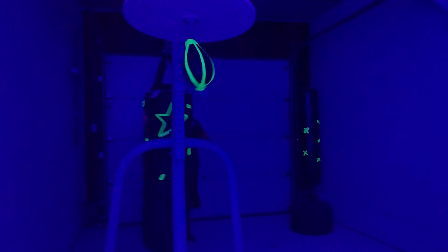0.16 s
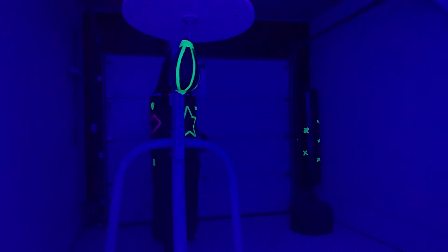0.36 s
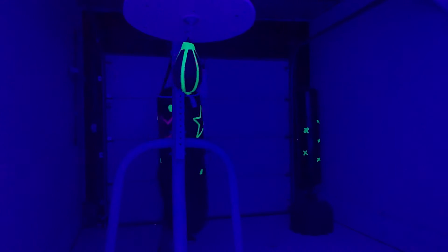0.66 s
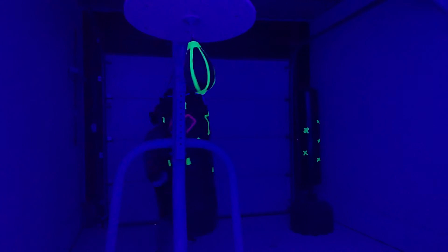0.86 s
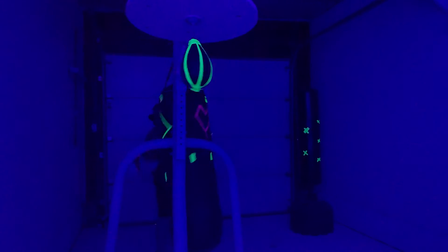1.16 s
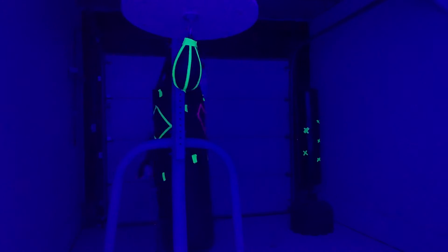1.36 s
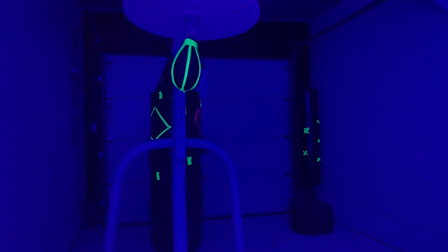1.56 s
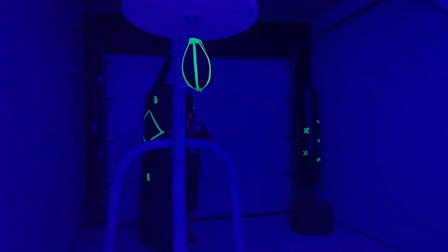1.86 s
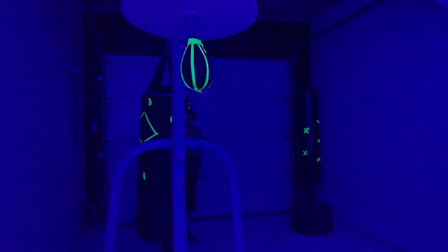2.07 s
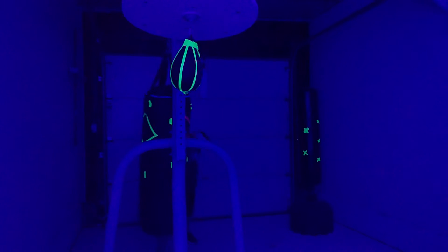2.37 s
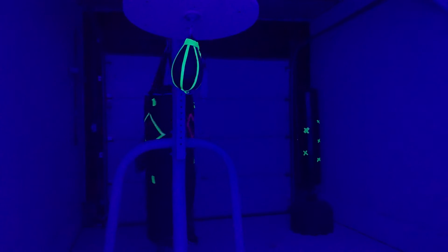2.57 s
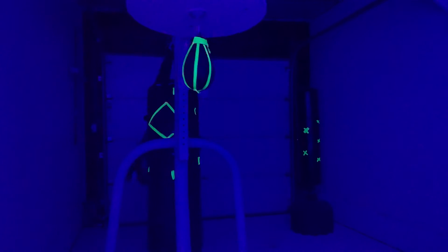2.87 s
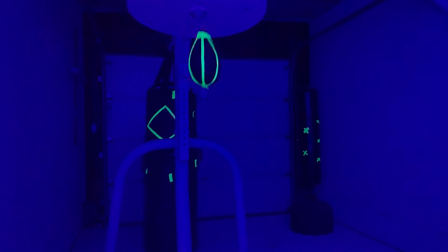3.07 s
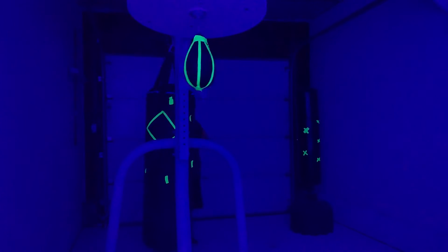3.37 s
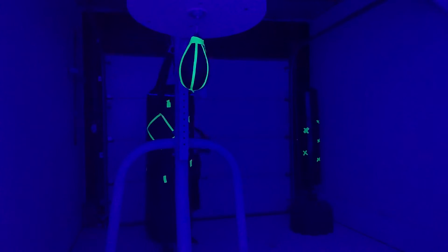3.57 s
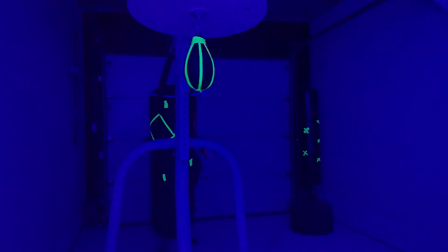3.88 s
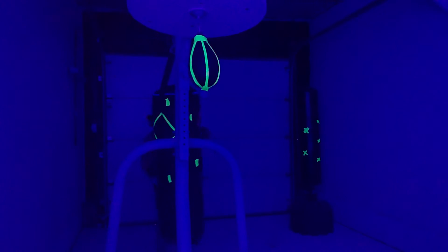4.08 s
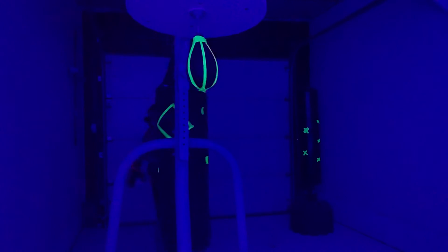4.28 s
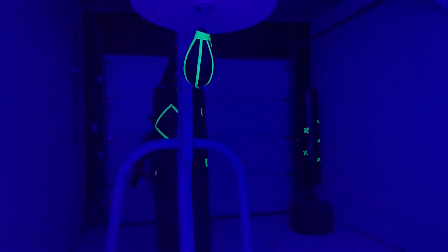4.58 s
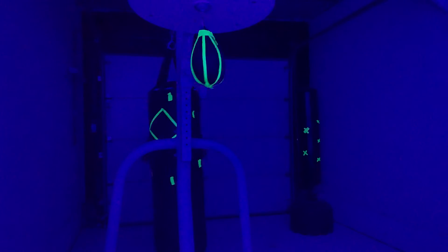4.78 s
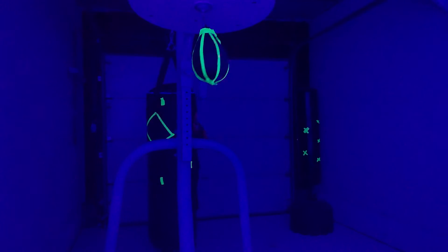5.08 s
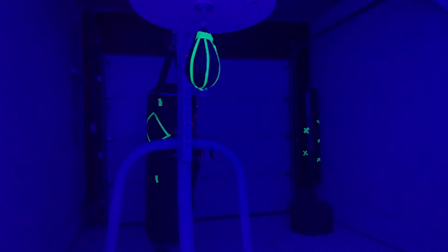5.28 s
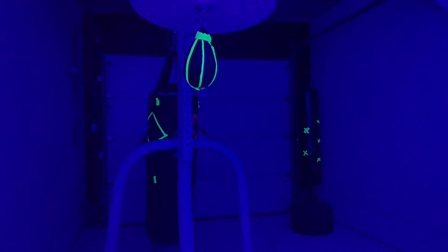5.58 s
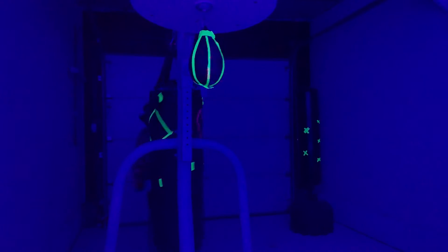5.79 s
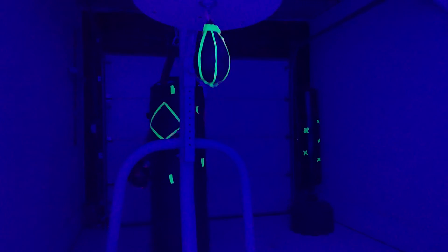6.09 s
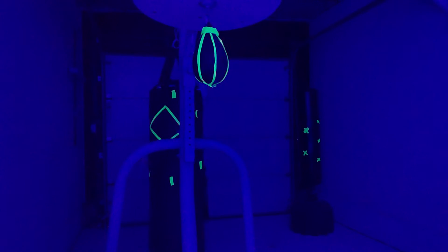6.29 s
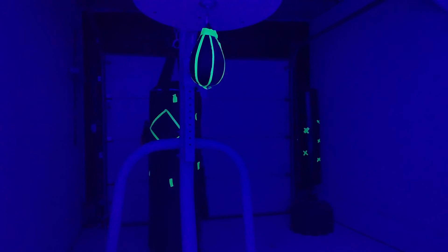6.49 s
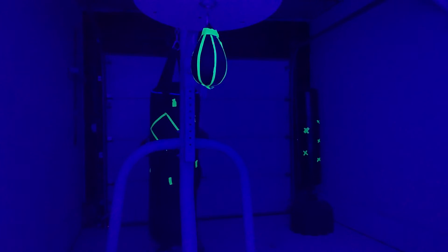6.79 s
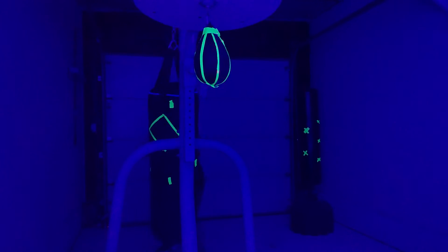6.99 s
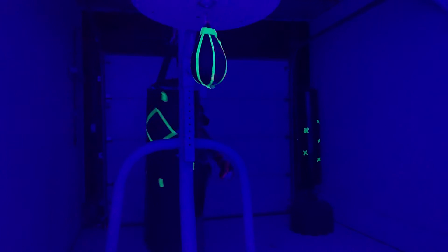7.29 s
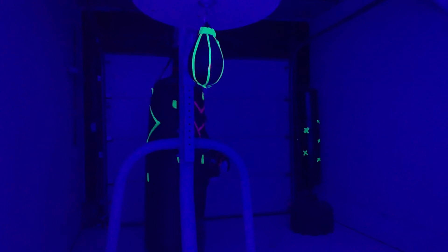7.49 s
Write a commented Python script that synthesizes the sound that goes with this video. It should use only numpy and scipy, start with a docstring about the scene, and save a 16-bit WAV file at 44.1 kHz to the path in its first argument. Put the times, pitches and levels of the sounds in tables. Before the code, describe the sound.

Five hard kicks slap a hanging heavy bag in a bare, echoing home gym, with booming steps, scuffing soles and rattling chain.

```python
"""Heavy-bag kicks in a live gym

A small, bare home gym in stereo; the microphone hears far more of the room than of the direct sound.
Five times over, two running steps boom on the floor modes, a sole scrapes round and the kick slaps the bag:
filtered grains with a resonant crack. Chain links rattle as clusters of grains, and the steel stand rings
in decaying modes. Soles shuffle as gritty noise, and now and then one squeals in unsteady harmonics.
"""
import sys
import numpy as np
from scipy import signal
from scipy.fft import rfft, irfft
from scipy.io import wavfile
from scipy.ndimage import uniform_filter1d

SR = 44100
rng = np.random.default_rng(int(sys.argv[2]) if len(sys.argv) > 2 else 0)


def store_wav(level_fs):
    """Save 16-bit WAV to argv[1]."""
    pcm = np.round(np.clip(np.atleast_2d(level_fs), -1, 1) * 32767)
    wavfile.write(sys.argv[1], SR, pcm.T.astype(np.int16))


N = 336924
T = np.arange(SR) / SR  # one second: the life of any single event

# treble lift per dB of brightness: (frequency [Hz], share)
BRIGHTNESS_SHARE = [(2000, 0.22), (7000, 0.9), (12000, 0.88)]

# the gym's decay, read only at the band centres of room(): (frequency [Hz], t60 [s])
ROOM_T60 = [(60, 1.5), (250, 0.57), (500, 0.64), (1000, 0.83), (3000, 0.72), (7000, 1.2), (10000, -0.9),
            (15000, 0.5)]
# the gym's stereo width: (frequency [Hz], side minus mid [dB])
ROOM_SIDE = [(60, -54), (125, -14), (250, -13.5), (500, -6.5), (1000, 1), (4000, 0.5)]
BALANCE_DB = -0.82  # left minus right
TOP_HZ = 16100

# steady air of the place: (frequency [Hz], relative level per Hz [dB])
AIR_SPECTRUM = [(20, -22), (40, -28), (62, 17), (110, -8), (300, 4), (510, 7.5), (750, 5.5), (2000, -2),
                (6000, -3), (10000, -24), (15000, -29)]
AIR_DB = -44

# soles shuffling back into place: (time [s], length [s], level [dB], brightness [dB])
SCUFFS = [(0.081, 0.057, -20.5, 0), (0.253, .048, -21, -7), (0.421, 0.022, -24.5, 4),
          (0.546, 0.025, -23.5, -3), (0.589, 0.032, -20.5, 5.5), (0.801, 0.028, -24.5, 1),
          (0.828, 0.026, -24, 5.5), (1.239, 0.085, -22.5, 5), (1.475, 0.086, -22.5, 2.5),
          (1.687, 0.081, -22, -3), (1.794, 0.12, -31, 7), (2.015, 0.037, -19.5, 5.5),
          (2.168, 0.073, -24, -7), (2.315, .055, -23.5, 6), (2.496, 0.033, -24, 0.5),
          (2.775, 0.12, -23, 5.5), (3.091, .11, -26, 5), (3.408, 0.092, -26, 3), (3.635, 0.039, -28.5, 0),
          (3.793, .07, -36, -19), (4.005, 0.03, -23.5, 4.5), (4.765, 0.085, -28, 3),
          (5.059, 0.061, -34, 5.5), (5.258, 0.035, -30, 0), (5.368, 0.033, -37, 5.5),
          (5.681, 0.041, -37, -2), (6.309, 0.054, -19.5, 3.5), (6.413, 0.026, -21, 1),
          (6.607, 0.036, -22.5, 0.5), (6.838, 0.027, -23.5, -6), (7.031, 0.032, -17.5, 4),
          (7.09, .04, -18.5, -4), (7.18, 0.042, -19.5, 1), (7.487, 0.12, -22.5, 3.5), (7.583, .06, -14, 2)]
# a foot pivoting until the kick lands: (time [s], level [dB], brightness [dB])
PIVOTS = [(1.041, -19.5, 3), (2.636, -19.5, -2), (4.212, -18.5, 4.5), (5.845, -19.5, 2), (7.29, -19.5, -2)]
# grit under a sliding sole: (frequency [Hz], relative level per Hz [dB])
SOLE_SPECTRUM = [(80, -17), (200, -10), (400, -6.5), (510, 2.5), (680, -6), (850, -3.5), (1100, 2),
                 (2100, 3.5), (3500, -0.5), (5200, -2.5), (6800, -2), (8300, -8), (11000, -9.5),
                 (15000, -14.5)]
# fine hiss of a skimming sole: (frequency [Hz], relative level per Hz [dB])
SKIM_SPECTRUM = [(500, -8), (2000, -34), (4000, 2), (7000, -17), (9500, -6), (15000, -5.5)]
RISE_SHARE = 0.17  # the longer a slide, the more gently it starts
LANDING_S, LANDING_BRIGHT_DB = 0.051, 3
# a pivot is brisk at first, then a duller drag
BRISK_S, DRAG_DB, DRAG_BRIGHT_DB = 0.075, -4.5, -13.5
# the other foot follows each shuffle, louder per second of the shuffle's length
FOLLOW_S, FOLLOW_LENGTH_S, FOLLOW_BRIGHT_DB = 0.12, 0.051, -9
FOLLOW_DB, FOLLOW_DB_PER_S = -22, 151

# heavy footfalls: (time [s], level [dB], floor pitch [Hz], scuff of the landing sole [dB])
STEPS = [(0.708, -15, 88, -26.5), (0.933, -11.5, 86.7, -20.5), (2.335, -16, 84.6, -27.5),
         (2.553, -13, 89, -19.5), (3.942, -19, 86, -31), (4.154, -13, 83.3, -23), (5.516, -25.5, 85, -39),
         (5.751, -17.5, 86.7, -29), (6.973, -16, 86, -28.5), (7.215, -16.5, 79.6, -21)]
# modes of the floor under a heel: (multiple of its pitch, relative level [dB], t60 [s])
FLOOR_MODES = [(.72, -5.5, 0.27), (1, 4.5, 0.13), (1.64, -5.5, 0.22), (2.55, -13.5, 0.26)]
# dull knock of the shoe: (frequency [Hz], relative level per Hz [dB])
HEEL_SPECTRUM = [(30, -12), (85, 0), (220, 2), (400, 1.5), (600, -3), (1000, -3), (2000, -37), (6000, -38)]

# squeals of a twisting sole: (time [s], length [s], level [dB], pitch [Hz], tilt [dB per octave])
SQUEALS = [(0.076, 0.027, -26.5, 775, -1), (0.248, 0.019, -26, 780, -0.5), (0.62, 0.023, -28, 1032, -2),
           (1.051, 0.045, -22.5, 781, -2.5), (1.168, 0.055, -24.5, 808, 0.5), (2.626, 0.16, -31, 769.5, -1),
           (4.264, 0.076, -26.5, 785, 0)]
# partials of the squeal: (multiple of its pitch, relative level [dB])
SQUEAL_PARTIALS = [(1, -14), (2, 0), (3, -4), (4, -6), (6, -12), (7, -16)]

# the bag knocking on its hanger between kicks: (time [s], level [dB])
BUMPS = [(0.002, -23.5), (0.249, -28), (0.39, -26), (0.57, -32), (1.095, -17), (1.479, -18.5), (1.682, -22),
         (2.0, -29.5), (2.976, -18), (3.139, -20.5), (3.22, -24.5), (3.712, -32.5)]
# muffled bump of the packed bag: (frequency [Hz], relative level per Hz [dB])
BUMP_SPECTRUM = [(25, -40), (45, -30), (62, 4), (95, -13.5), (145, 1), (200, -8), (320, -6), (500, -5),
                 (1200, -13), (4000, -57)]
# a kicked bag drops back on its hanger once, then nudges it as it sways
JOLT_LAG_S, REBOUND_S, REBOUND_DB = 0.00804, 0.072, 0.5
SWAY_GAP_S, SWAY_FALL_DB_PER_S = 0.2, 4.5

# the chain snapping taut: (time [s], level [dB], rattle length [s], brightness [dB])
SNATCHES = [(2.874, -11.5, 0.038, 16), (4.419, -24, 0.012, 21), (6.101, -13, 0.044, 21),
            (6.297, -22, 0.022, 27)]
# bouts of chain rattle: (time [s], swell [s], level [dB], brightness [dB], dying away [dB per s],
# pitch of the tube struck [Hz], its clang [dB], its t60 [s], pitch of the hook's clink [Hz])
RATTLES = [(0.0, 0.0057, -14.5, 6, 235, 1572, -41, .3, 2300),
           (1.291, 0.11, -12, -12, 220, 1123, -21.5, 0.83, 2310),
           (1.53, 0.071, -25.5, 8, 75, 1413, -27.5, 0.42, 2047),
           (2.844, 0.11, -12.5, -6.5, 127, 957, -19, 0.45, 2000),
           (4.42, 0.079, -11, -4.5, 220, 1007, -20, 0.78, 2780),
           (6.03, 0.12, -10, -3, 240, 1355, -23.5, 0.55, 1566),
           (6.235, .01, -18, -9, 120, 1163, -24, 0.47, 1480),
           (7.238, 0.013, -20.5, 8, 200, 933, -29.5, 0.27, 1850),
           (7.585, .05, -13.5, 14, 130, 1865, -22.5, .3, 2300)]
# links knocking together: (frequency [Hz], relative level per Hz [dB])
CHAIN_SPECTRUM = [(100, -28), (220, -3), (320, -4), (400, -9), (600, 0.5), (820, -4), (1050, 4),
                  (1400, 3.5), (1800, -0.5), (2300, -2.5), (3200, -4), (4500, -7.5), (6700, -12),
                  (9000, -15.5), (15000, -18.5)]
# modes of the steel stand: (nominal frequency [Hz], relative level before scatter [dB], t60 [s])
STAND_MODES = [(255.3, -6, 0.55), (324.8, -13.5, 1), (457.3, 8.5, 0.21), (640, -17, 0.15), (967, -5, 1),
               (968, -10, 0.43), (1063, -8, 0.23), (1161, 11.5, 0.1), (1273, -15, 0.5), (1346, -2, 0.22),
               (1572, -14, 0.64), (1800, -27, 0.35), (2074, 24, 0.36), (2330, 11, 0.52), (2850, 6, 0.24),
               (3440, -15, 0.091)]
# within a bout the links meet in clusters that swell, then grow weaker and duller
CLUSTER_GAP_S, CLUSTER_S = 0.04, 0.034
SWELL_DB_PER_S, DULLING_DB_PER_S = 7, 70
STEEL_DB = -10  # ringing stand, relative to the links

# the hook clinks briefly just before every clang
CLINK_DB, CLINK_T60_S, CLANG_LAG_S = 3, 0.15, 0.015
# the stand's post rings with every clang, lasting this many times as long as the tube struck
POST_HZ, POST_DB, POST_LASTING = 949, -3.5, 1.06

# kicks on the bag cover: (time [s], rise [s], slap level [dB], brightness [dB], pitch of the crack [Hz],
# crack relative to slap [dB], jolt of the bag [dB], its later sway before it dies down [dB])
KICKS = [(1.266, 0.0072, -6.5, -14, 2660, 6.5, -16.5, -28), (2.831, 0.0024, -2.5, -3, 2270, -1, -19, -35.5),
         (4.411, 0.0018, -4, 8, 2430, 6.5, -24.5, -60), (5.986, 0.034, 2.5, 4, 1790, 7, -16.5, -29),
         (7.548, 0.02, -3.5, 11, 1900, 6.5, -28.5, -36)]
# slap of the cover: (frequency [Hz], relative level per Hz [dB])
SLAP_SPECTRUM = [(100, -20), (400, -15.5), (800, -1), (1500, -3.5), (2600, -4), (3500, -7.5), (5000, -11),
                 (8000, -15), (15000, -23)]


def undb(db):
    """Decibels to gain."""
    return 10 ** (np.asarray(db) / 20)


def unit(x):
    """Scale to rms 1."""
    return x / np.sqrt(np.mean(x ** 2))


def read(points, hz):
    """A table joined by straight lines on a log-frequency axis."""
    at, value = np.transpose(points)
    return np.interp(np.log(hz + 1), np.log(at), value)


def colour(x, spectrum, bright_db=0):
    """Give x a spectrum with an optional treble lift; rms 1."""
    hz = np.fft.rfftfreq(len(x), 1 / SR)
    gain_db = read(spectrum, hz) + bright_db * read(BRIGHTNESS_SHARE, hz)
    return unit(irfft(rfft(x) * undb(gain_db), len(x)))


def fade(t60):
    """Exponential decay, 60 dB in t60 seconds."""
    return np.exp(-np.log(1000) * T / t60)


def stroke(length, rise, release):
    """A push that builds, holds and lets go; times in seconds."""
    build = np.minimum(T / max(rise, 1 / SR), 1)
    return build * np.exp(-np.maximum(T - length, 0) / release)


def grains(rate, spread_db):
    """Random tiny impacts, rate a second, of scattered sizes."""
    sign, size = rng.standard_normal((2, SR))
    struck = rng.random(SR) < rate / SR
    return struck * np.sign(sign) * undb(spread_db * size)


def wobble():
    """A random waver that changes within some milliseconds; rms 1."""
    return unit(uniform_filter1d(rng.standard_normal(SR), size=260))


def add(track, s, sound):
    """Mix a sound into the track at time s."""
    start = max(int(s * SR), 0)
    track[start:start + len(sound)] += sound[:max(N - start, 0)]


def widen(mid, side):
    """Left and right hear nearly the same bass but unrelated treble."""
    hz = np.fft.rfftfreq(len(side), 1 / SR)
    side_gain = undb(read(ROOM_SIDE, hz))
    m, s = rfft(mid), rfft(side) * side_gain
    return irfft(np.array([m + s, m - s]) / np.sqrt(1 + side_gain ** 2), len(mid))


def room(x, direct_db=-10, early_db=-5, early_t60=0.07):
    """One source in the gym: weak direct sound, a flurry from near walls, a dense tail longest in the bass."""
    hz = np.fft.rfftfreq(SR, 1 / SR)
    centres = np.geomspace(60, 15000, 9)
    noise = rfft(rng.standard_normal((2, SR)))
    tail = 0
    for centre in centres:
        band = read(list(zip(centres, centres == centre)), hz)
        tail = tail + irfft(noise * band, SR) * fade(read(ROOM_T60, centre))
    early = np.array([grains(rate=3000, spread_db=1.0) for _ in range(2)]) * fade(early_t60)
    diffuse = rfft(unit(tail) + undb(early_db) * unit(early))
    # a diffuse field carries the same energy in every band
    diffuse /= np.sqrt(uniform_filter1d(np.abs(diffuse) ** 2, size=90, axis=1))
    response = widen(*irfft(diffuse, SR))
    response[:, 0] += undb(direct_db)
    response /= np.sqrt(np.sum(response ** 2) / 2)
    return signal.fftconvolve(x[None], response[:, :SR * 9 // 10], axes=1)[:, :N]


def air():
    """The steady air of the place: coloured noise, wide in the treble."""
    mid, side = (colour(rng.standard_normal(N), AIR_SPECTRUM) for _ in range(2))
    return undb(AIR_DB) * widen(mid, side)


def slides():
    """Landings, pivots and two-footed shuffles; rows of (time [s], length [s], level [dB], brightness [dB])."""
    rows = [(s, LANDING_S, db, LANDING_BRIGHT_DB) for s, _, _, db in STEPS]
    for (s, db, bright_db), (kick_s, *_) in zip(PIVOTS, KICKS):
        drag_s = s + BRISK_S
        rows.append((s, BRISK_S, db, bright_db))
        rows.append((drag_s, kick_s - drag_s, db + DRAG_DB, DRAG_BRIGHT_DB))
    for s, length, db, bright_db in SCUFFS:
        follow_db = db + FOLLOW_DB + FOLLOW_DB_PER_S * length
        rows.append((s, length, db, bright_db))
        rows.append((s + FOLLOW_S, FOLLOW_LENGTH_S, follow_db, FOLLOW_BRIGHT_DB))
    return rows


def scuffs(grit_rate=9000, touch_db=-13, touch_gain=2.7, touch_share=0.36):
    """A sliding sole catches on countless grains; a fine hiss skims its start, louder in brighter slides."""
    out = np.zeros(N)
    for s, length, db, bright_db in slides():
        rise = RISE_SHARE * length
        grit = colour(grains(grit_rate, spread_db=3.5), SOLE_SPECTRUM, 0.5 * bright_db)
        slide = stroke(length, rise, release=0.02) * grit
        hiss = colour(rng.standard_normal(SR), SKIM_SPECTRUM)
        skim = stroke(touch_share * length, rise=0.45 * rise, release=0.017) * hiss
        add(out, s, undb(db) * (slide + undb(touch_db + touch_gain * bright_db) * skim))
    return out


def steps(contact=0.0084, heel_db=-9, heel_t60=0.31):
    """A soft heel loads the floor: its low boom, and the duller knock of the shoe."""
    boom, knock = np.zeros((2, N))
    loading = 1 - np.exp(-(T / contact) ** 2)
    for s, db, hz, _ in STEPS:
        modes = sum(undb(mode_db) * fade(t60) * np.sin(2 * np.pi * hz * k * T)
                    for k, mode_db, t60 in FLOOR_MODES)
        add(boom, s, -undb(db) * modes * loading)
        heel = colour(rng.standard_normal(SR), HEEL_SPECTRUM)
        add(knock, s, undb(db + heel_db) * fade(heel_t60) * heel)
    return boom, knock


def squeals(waver=0.007, release=0.008, flutter_db=2.5):
    """The twisting sole sticks and slips at an unsteady pitch; each partial flutters on its own."""
    out = np.zeros(N)
    for s, length, db, hz, tilt_db in SQUEALS:
        phase = 2 * np.pi * np.cumsum(hz * (1 + waver * wobble())) / SR
        tone = 0
        for k, partial_db in SQUEAL_PARTIALS:
            level_db = partial_db + tilt_db * np.log2(k) + flutter_db * wobble()
            tone = tone + undb(level_db) * np.sin(k * phase)
        add(out, s, undb(db) * stroke(length, release, release) * unit(tone))
    return undb(2.5) * room(out) + undb(-11) * out


def jolts(count=6):
    """Each kick jolts the bag, which rebounds and sways ever more gently; rows of (time [s], level [dB])."""
    rows = list(BUMPS)
    for s, *_, db, sway_db in KICKS:
        ages = REBOUND_S + SWAY_GAP_S * (np.arange(count) + 1 + rng.random(count))
        rows += [(s + JOLT_LAG_S, db), (s + REBOUND_S, db + REBOUND_DB)]
        rows += [(s + age, sway_db - SWAY_FALL_DB_PER_S * age) for age in ages]
    return rows


def bumps(t60=0.15):
    """The packed bag jolts on its hanger with a muffled bump."""
    out = np.zeros(N)
    for s, db in jolts():
        thud = colour(rng.standard_normal(SR), BUMP_SPECTRUM)
        add(out, s, undb(db) * fade(t60) * stroke(1, rise=0.0029, release=1) * thud)
    return out


def clusters(count=7):
    """Snatches, and bouts that swell and die away; rows of (time [s], level [dB], length [s], brightness [dB])."""
    rows = list(SNATCHES)
    for s, swell, db, bright_db, fall_db, *_ in RATTLES:
        uneven = rng.uniform(-0.15, 0.15, count) * (np.arange(count) > 0)
        for age in CLUSTER_GAP_S * (np.arange(count) + uneven):
            before, after = max(swell - age, 0), max(age - swell, 0)
            level_db = db - SWELL_DB_PER_S * before - fall_db * after
            rows.append((s + age, level_db, CLUSTER_S, bright_db - DULLING_DB_PER_S * after))
    return rows


def chain(link_rate=850):
    """Links knock together in short clusters, and each cluster sets the stand ringing."""
    out = np.zeros(N)
    for s, db, length, bright_db in clusters():
        links = colour(grains(link_rate, spread_db=5.5), CHAIN_SPECTRUM, bright_db)
        links *= stroke(length / 2, rise=0.0005, release=length / 2)
        # every cluster lands differently, so the modes share its energy differently
        chance = rng.standard_normal((len(STAND_MODES), 3))
        ring = 0
        for (hz, mode_db, t60), (louder, sharper, phase) in zip(STAND_MODES, chance):
            tone = np.sin(2 * np.pi * (hz * (1 + 0.0035 * sharper) * T + phase))
            ring = ring + undb(mode_db + 2 * louder) * fade(t60) * tone
        ring *= 1 - np.exp(-2 * T / length)
        ring *= np.sqrt(np.sum(links ** 2) / np.sum(ring ** 2))  # same energy as the links
        add(out, s, undb(db) * (links + undb(STEEL_DB) * ring))
    return out


def tube_strikes():
    """Each bout strikes hook, tube and post; rows of (time [s], level [dB], pitch [Hz], t60 [s])."""
    rows = []
    for s, *_, tube_hz, db, t60, hook_hz in RATTLES:
        clang_s = s + CLANG_LAG_S
        rows.append((s, db + CLINK_DB, hook_hz, CLINK_T60_S))
        rows.append((clang_s, db, tube_hz, t60))
        rows.append((clang_s, db + POST_DB, POST_HZ, POST_LASTING * t60))
    return rows


def clangs(split=0.015, twin_db=-5):
    """A slightly oval tube rings on a close pair of modes that beat."""
    out = np.zeros(N)
    for s, db, hz, t60 in tube_strikes():
        twin = np.sin(2 * np.pi * (hz * (1 + split) * T + rng.random()))
        pair = np.sin(2 * np.pi * hz * T) + undb(twin_db) * twin
        add(out, s, undb(db) * pair * fade(t60) * np.minimum(T / 0.015, 1))
    return out


def kicks(slap_t60=0.085, crack_q=2.35):
    """The shin slaps the cover: a crack, pitched by the trapped air, that the filling soon soaks up."""
    out = np.zeros(N)
    for s, rise, db, bright_db, hz, crack_db, _, _ in KICKS:
        slap = colour(grains(rate=6000, spread_db=3.5), SLAP_SPECTRUM, bright_db)
        crack = signal.lfilter(*signal.iirpeak(hz, crack_q, fs=SR), slap)
        shape = np.minimum(T / rise, 1) * fade(slap_t60)
        add(out, s, undb(db) * shape * (slap + undb(crack_db) * crack))
    return out


def scene():
    """Sources sound from their places in the room; floor boom and tubes also reach the microphone straight."""
    boom, knock = steps()
    tubes = clangs()
    feet = room(scuffs()) + room(knock + undb(-15) * boom) + squeals()
    stand = room(chain() + undb(2) * tubes)
    bag = room(kicks() + bumps())
    near = undb(-1.0) * boom + undb(1.5) * tubes
    balance = undb(np.array([[BALANCE_DB], [-BALANCE_DB]]) / 2)
    return (air() + feet + stand + bag + near) * balance


def record(dry, low_cut_hz=45):
    """The recorder thins the deep bass, clips the loudest peaks and cuts the top."""
    thin = signal.sosfilt(signal.butter(2, low_cut_hz, "high", fs=SR, output="sos"), dry)
    clipped = np.clip(thin, -0.9, 0.9)
    return signal.sosfilt(signal.ellip(10, 0.2, 70, TOP_HZ, fs=SR, output="sos"), clipped)


dry = scene()
out = record(dry)
store_wav(out)
```